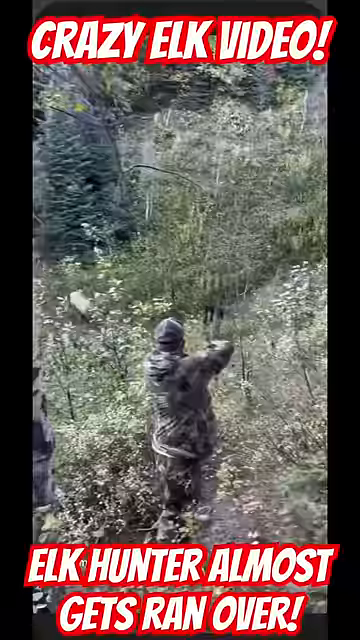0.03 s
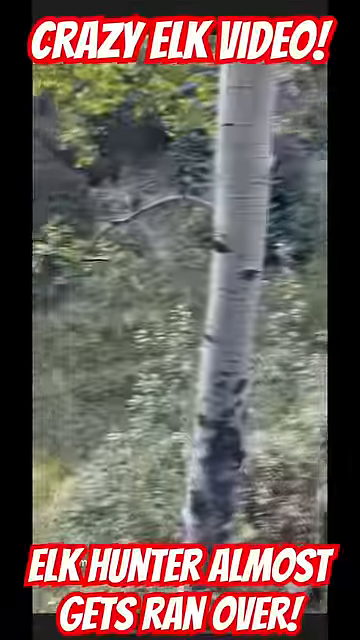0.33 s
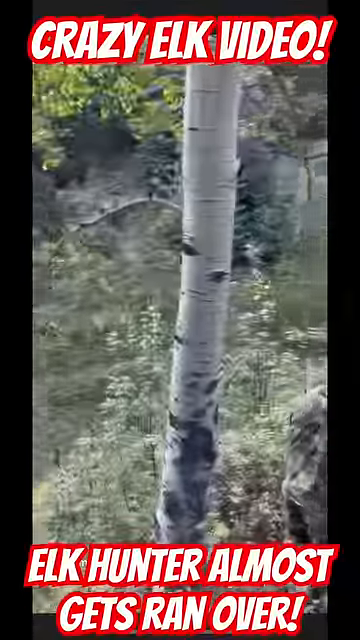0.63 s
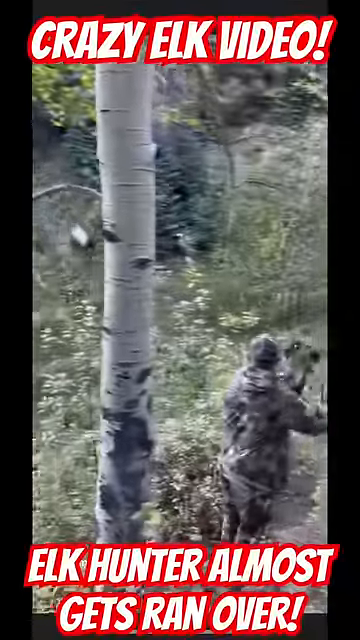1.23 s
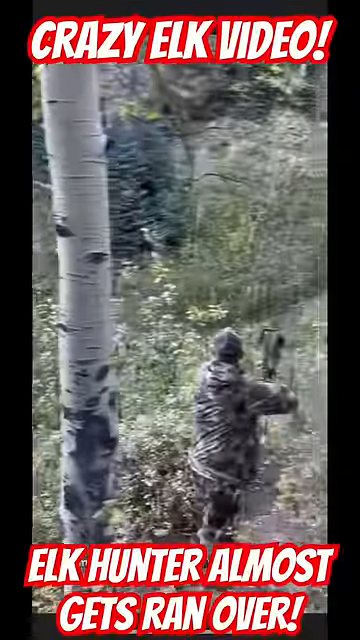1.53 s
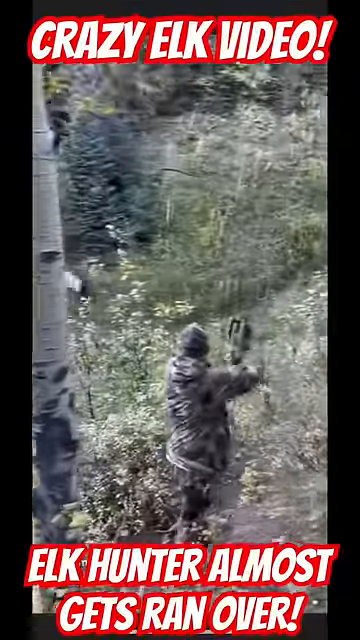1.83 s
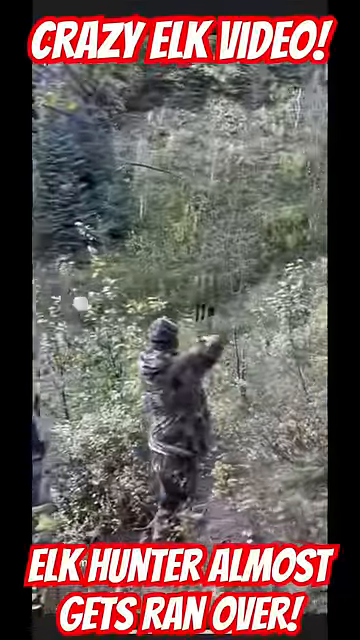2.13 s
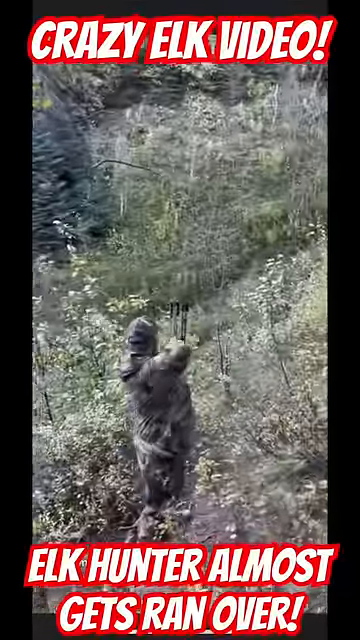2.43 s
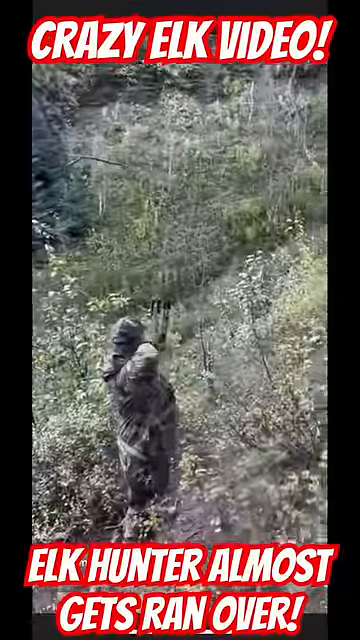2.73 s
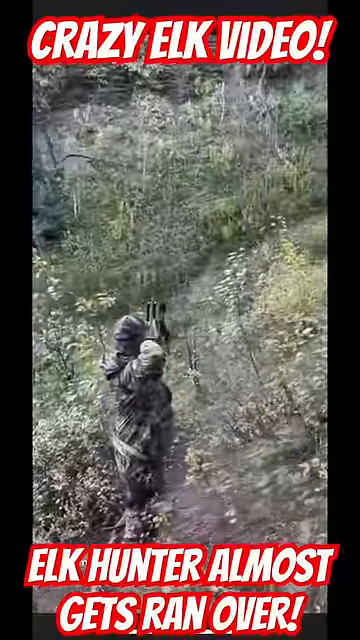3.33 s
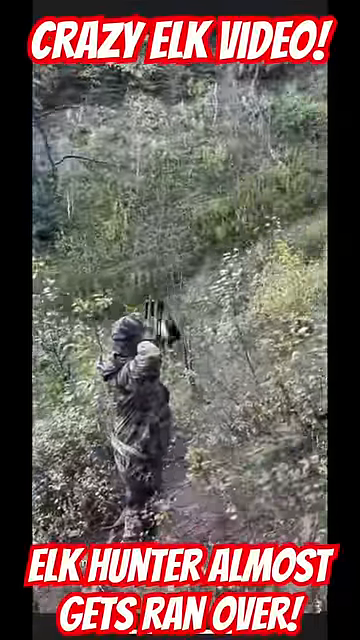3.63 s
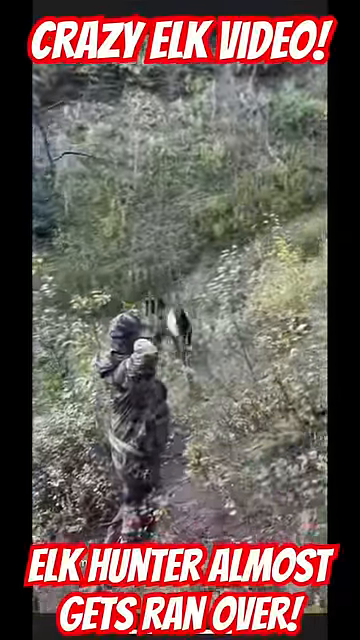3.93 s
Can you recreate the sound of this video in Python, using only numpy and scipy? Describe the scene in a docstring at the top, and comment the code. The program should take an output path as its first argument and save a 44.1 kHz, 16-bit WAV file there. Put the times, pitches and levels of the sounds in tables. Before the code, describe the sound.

An elk call is the loudest sound, arriving at the end. First, leaves and clothing swish quietly and dry stems crackle, with soft steps and low microphone rumble. A twig snaps sharply, very close, at about 1.5 seconds. Thuds grow heavier between 2 and 2.6 seconds. At 3.7 seconds the elk squeals, high and clean, sliding down into a raspier nasal mew through 4 seconds, with a brief woodland echo.

```python
"""In dry brush among trees, someone walks with a hand-held camera. The handling rumbles, steps thud,
leaves and clothing rub and swish, stems crackle, and one twig snaps very close by.
Then a loud elk call starts as a high clean squeal and slides down into a nasal mew:
a gliding tone and its overtones, shaped by the throat and scattered briefly by the trees."""
import sys
import numpy as np
from scipy import signal
from scipy.fft import rfft, irfft
from scipy.io import wavfile
from scipy.ndimage import uniform_filter1d, map_coordinates

SR = 44100
rng = np.random.default_rng(int(sys.argv[2]) if len(sys.argv) > 2 else 0)


def master(y):
    """Save y as 16-bit WAV."""
    cut = np.clip(np.atleast_2d(y).T, -1, 1)
    pcm = np.round(cut * 32767)  # scale
    wavfile.write(sys.argv[1], SR, pcm.astype(np.int16))


N = 176400
T = np.arange(N) / SR
HZ = np.fft.rfftfreq(N, 1 / SR)
EARS = np.array([[.5], [-.5]])  # half to the left ear, the opposite to the right


def amp(db):
    """Turns decibels into a gain."""
    return 10 ** (np.asarray(db) / 20)


def unit_rms(x):
    """Scales a sound to an average power of 1."""
    return x / np.sqrt(np.mean(x ** 2) + 1e-20)


def over_time(rows, col=1):
    """Joins the points of a time table, one value per sample."""
    rows = np.array(rows)
    return np.interp(T, rows[:, 0], rows[:, col])


def at_freq(rows, hz, col=1):
    """Looks up a frequency table on a log axis."""
    rows = np.array(rows)
    return np.interp(np.log(hz + 1), np.log(rows[:, 0]), rows[:, col])


def add(mix, start_s, sound):
    """Mixes a sound in at start_s."""
    part = mix[:, round(start_s * SR):][:, :sound.shape[-1]]
    part += sound[..., :part.shape[1]]


def wander(rate_hz):
    """Random drift, up to about rate_hz."""
    return unit_rms(irfft(rfft(rng.standard_normal(N)) / (1 + (HZ / rate_hz) ** 4), N))


# How alike the two ears are (1 = the same): freq_hz, likeness
EAR_LIKENESS = [(60, 1), (150, 0.84), (700, 0.3), (1400, 0.77), (4500, 0.35), (7500, 0.86)]
def spread(pair, colour):
    """Gives two noises a tone colour and makes them partly alike, as left and right."""
    a, b = rfft(pair)
    likeness = np.clip(at_freq(EAR_LIKENESS, HZ), -1, 1)
    mid, side = a * np.sqrt(1 + likeness), b * np.sqrt(1 - likeness)
    return unit_rms(irfft(np.array([mid + side, mid - side]) * amp(at_freq(colour, HZ)), N))


def woods(x, build_s=0.033, fade_60db_s=0.28):
    """Trunks and leaves scatter a sound into tiny echoes that build up and die away."""
    t = T[:SR // 2]
    echoes = rng.standard_normal((2, len(t))) * (rng.random((2, len(t))) < .05)
    echoes *= amp(-60 * t / fade_60db_s) * np.minimum(t / build_s, 1) ** 2
    return signal.fftconvolve(x, echoes / np.linalg.norm(echoes[0]), axes=1)[:, :N]


# Loudness of the handling: time_s, level_db
RUMBLE_LEVEL = [(.1, -59), (.5, -57.5), (.98, -44.5), (1.13, -58), (1.7, -50), (1.9, -42.5), (2.6, -40.5),
                (2.9, -47.5), (3.25, -46), (3.75, -56.5)]
# Its deep tone colour: freq_hz, gain_db
RUMBLE_COLOUR = [(20, -25.5), (40, 1), (70, 2), (200, -12), (1000, -58)]
def rumble(wobble_db=2.5):
    """The camera moving in the hand makes a low, uneven noise."""
    level_db = over_time(RUMBLE_LEVEL) + wobble_db * wander(rate_hz=13)
    return amp(level_db) * spread(rng.standard_normal((2, N)), RUMBLE_COLOUR)


# Steps and handling bumps: start_s, level_db, pitch_hz, decay_s
THUDS = [(0.186, -40, 71, 0.0097), (0.534, -41, 187, 0.0077), (0.736, -33, 65, 0.019),
         (0.906, -36, 196, 0.017), (.926, -34.5, 230, 0.0022), (1.024, -30, 170.6, 0.009),
         (1.962, -28.5, 75.5, 0.0079), (2.204, -27, 63.6, 0.023), (2.348, -24.5, 166, 0.0041),
         (2.399, -27.5, 159, 0.0048), (2.434, -29.5, 80, 0.011), (2.563, -18, 136, 0.0036),
         (2.582, -22, 75.3, 0.018), (2.986, -37, 49, 0.018)]
# Tone colour of their scuff: freq_hz, gain_db
SCUFF_COLOUR = [(240, 7), (750, -14.5), (2500, -45)]
def thuds(scuff_gain=.45, scuff_decay_s=.011):
    """Each bump is a low knock that dies quickly, with a dull scuff."""
    out, t = np.zeros((2, N)), T[:SR // 4]
    noise = spread(rng.standard_normal((2, N)), SCUFF_COLOUR)
    for start_s, db, hz, decay_s in THUDS:
        knock = -np.sin(2 * np.pi * hz * t) * t / decay_s * np.exp(1 - t / decay_s)
        scuff = scuff_gain * np.exp(-t / scuff_decay_s) * noise[:, round(start_s * SR):][:, :len(t)]
        add(out, start_s, amp(db) * (knock + scuff))
    return out


def friction(colour, ticks_per_s=2500, tick_share=0.4, tick_spread_db=3, patch_db=1.4, flicker_db=1.45):
    """Many tiny leaf contacts tick over a smooth wash of noise."""
    ticks = rng.standard_normal((2, N)) * (rng.random((2, N)) < ticks_per_s / SR)
    ticks *= amp(tick_spread_db * np.minimum(rng.exponential(1, (2, N)), 4))
    rub = rng.standard_normal((2, N)) * (1 - tick_share) + tick_share * unit_rms(ticks)
    spectra = signal.stft(rub, nperseg=512)[2]
    # random patches of frequency and time get louder or softer
    patches = uniform_filter1d(rng.standard_normal(spectra.shape[1:]), size=8, axis=0)
    patches = unit_rms(uniform_filter1d(patches, size=7, axis=1))
    rub = signal.istft(spectra * amp(patch_db * patches), nperseg=512)[1][:, :N]
    return spread(rub, colour) * amp(flicker_db * wander(rate_hz=40))


# Constant stirring of the brush: time_s, level_db
STIR_LEVEL = [(.1, -56), (.6, -55), (.8, -49.5), (1.4, -48.5), (1.55, -45.5), (1.65, -48.5), (2.05, -44),
              (2.3, -50), (2.5, -44.5), (2.8, -51), (3.68, -53), (3.76, -57.5)]
# Swishes of leaves and cloth: peak_s, length_s, body_db, hiss_db
SWISHES = [(0.15, 0.036, -49, -39.5), (0.283, 0.031, -51, -69), (0.538, 0.053, -54.5, -48),
           (0.723, 0.021, -42, -52), (0.898, .025, -43.5, -65), (0.932, 0.02, -36, -67),
           (1.074, 0.021, -45, -43.5), (1.235, 0.075, -45, -44), (1.868, 0.02, -38, -44),
           (1.971, 0.043, -39.5, -58), (2.231, 0.026, -43.5, -45.5), (2.614, 0.04, -41, -50),
           (2.819, 0.018, -40.5, -44.5), (2.879, 0.1, -46.5, -46), (3.146, 0.03, -46, -43),
           (3.386, 0.022, -49.5, -39.5), (3.622, 0.04, -49.5, -43)]
# Tone colour of the dull body: freq_hz, gain_db
BODY_COLOUR = [(200, 3), (450, 1.5), (1400, 0), (2200, -4.5), (3500, -8), (5000, -12.5), (16000, -32)]
# Tone colour of the leafy hiss: freq_hz, gain_db
HISS_COLOUR = [(500, -44), (2000, -3.5), (3800, -3), (5000, -4.5), (6500, 1), (9300, -1), (11500, -14),
               (15000, -7.5)]
def brush(rise_ratio=0.76, heavy_db=-50.5, low_hz=694):
    """Leaves and clothing rub in swishes that swell and fade; light movement has less bass."""
    body_power = hiss_power = amp(over_time(STIR_LEVEL)) ** 2
    for peak_s, length_s, body_db, hiss_db in SWISHES:
        width_s = length_s * np.where(T < peak_s, rise_ratio, 1)
        swell = np.exp(-2 * abs((T - peak_s) / width_s) ** 1.86)
        body_power = body_power + swell * amp(body_db) ** 2
        hiss_power = hiss_power + swell * amp(hiss_db) ** 2
    rub = friction(BODY_COLOUR)
    lightness = 1 - np.minimum(np.sqrt(body_power) / amp(heavy_db), 1)
    bass = irfft(rfft(rub) / (1 + (HZ / low_hz) ** 10), N)
    return np.sqrt(body_power) * (rub - lightness * bass) + np.sqrt(hiss_power) * friction(HISS_COLOUR)


# Stems cracking: start_s, level_db, centre_hz
STEM_CRACKS = [(0.1294, -38, 1250), (.154, -32.5, 2970), (.655, -36.5, 1130), (0.703, -36.5, 1580),
               (.794, -38, 1100), (.84, -39, 4500), (0.894, -31.5, 2040), (.907, -32, 1140),
               (0.933, -31.5, 4000), (1.96, -32.5, 2450), (2.362, -36.5, 6500), (2.401, -31.5, 2040),
               (2.479, -33.5, 860), (3.131, -29.5, 1670), (3.16, -37.5, 3750), (3.195, -35.5, 3970),
               (3.373, -39, 3460), (3.387, -33.5, 2620), (3.604, -35.5, 4200)]
def stems(decay_s=0.0027, width_octaves=1.05):
    """Each dry stem breaks with a short burst of noise in its own frequency band."""
    out, t = np.zeros((2, N)), T[:2048]
    hz = np.fft.rfftfreq(len(t), 1 / SR)
    for start_s, db, centre_hz in STEM_CRACKS:
        noise = rng.standard_normal(len(t)) + 1.2 * rng.standard_normal((2, len(t)))
        band = np.exp(-(np.log2((hz + 1) / centre_hz) / width_octaves) ** 2)
        burst = unit_rms(irfft(rfft(noise) * band))
        add(out, start_s, amp(db) * burst * np.exp(-t / decay_s))
    return out


# Ringing tones of the twig: pitch_hz, level_db, fade_60db_s, left_lead_rad
TWIG_TONES = [(1490, -7, 0.0069, 1.95), (3410, -0.5, 0.013, 2.6), (4600, 5.5, 0.0048, 2.08),
              (5180, 3, 0.0036, 2.07), (8840, -7, 0.0042, 3.6), (12900, -7.5, 0.0038, 0.78)]
def twig(start_s=1.4539, rise_s=0.00016, splinter_db=-14, splinter_decay_s=0.0019, echo_db=-37):
    """One very close snap: the wood splinters and rings for an instant."""
    out, t = np.zeros((2, N)), T[:SR // 20]
    for hz, db, fade_s, lead in TWIG_TONES:
        envelope = amp(db - 60 * t / fade_s) * (1 - np.exp(-t / rise_s))
        add(out, start_s, envelope * np.sin(2 * np.pi * hz * t + lead * EARS))
    splinters = spread(rng.standard_normal((2, N)), HISS_COLOUR)[:, :len(t)]
    add(out, start_s, amp(splinter_db) * splinters * np.exp(-t / splinter_decay_s))
    return out + amp(echo_db) * woods(out)


# How the elk's throat and mouth shape its sound: freq_hz, gain_db
THROAT = [(550, -5.5), (800, -3.5), (1300, -1), (2400, 6.5), (2950, 2.5), (3350, 0.5), (4150, -5),
          (4900, -8), (5400, -14)]
# Direction of the call: freq_hz, left_lead_rad, left_minus_right_db
CALL_DIRECTION = [(587, 4.4, -7), (1220, 2.07, -7), (1840, 2.58, -0.5), (2600, 1.4, 1), (3320, 2, 0),
                  (3870, 1.6, 7)]
def elk_breath(pitch_hz, low_hz=1100, top_hz=4600, pitch_follow=.12):
    """Air rasps through the throat, a band of noise that sinks a little with the pitch."""
    band = amp(at_freq(THROAT, HZ) / 2) * HZ ** 4 / (HZ ** 4 + low_hz ** 4) / (1 + (HZ / top_hz) ** 30)
    direction = np.exp(1j * EARS * at_freq(CALL_DIRECTION, HZ))
    air = irfft(rfft(rng.standard_normal(N)) * band * direction, N)
    position = np.cumsum((pitch_hz / pitch_hz[-1]) ** pitch_follow) % N  # slower reading sounds lower
    return unit_rms(np.array([map_coordinates(ear, [position]) for ear in air]))


# Harmonics (multiples of the pitch), lowest first: level_db
HARMONICS_DB = [1, -4.5, -6.5, -7.5, -8.5, -5, -9]
def elk_voice(pitch_hz, bright_db, soft_db=-21, full_voice_s=3.748, fray_rad=.6):
    """The voice starts almost pure, then gains wavering overtones; the highest ones flutter."""
    phase = 2 * np.pi * np.cumsum(pitch_hz) / SR
    soft_start_db = soft_db * np.clip((full_voice_s - T) / 0.019, 0, 1)
    top_hz = 3500 + 1.12 * pitch_hz  # overtones fade out above this
    voice = np.zeros((2, N))
    for k, db in enumerate(HARMONICS_DB, 1):
        hz = k * pitch_hz
        level_db = db + at_freq(THROAT, hz) + bright_db * max(k - 2, 0) + soft_start_db * (k > 1)
        gain = amp(level_db + EARS * at_freq(CALL_DIRECTION, hz, 2)) / (1 + (hz / top_hz) ** 40)
        fray = fray_rad * np.minimum(hz / top_hz, 1) ** 6 * wander(rate_hz=350)
        waver = amp(2 * amp(bright_db) * wander(rate_hz=56.3))
        voice -= gain * waver * np.cos(k * phase + fray + EARS * at_freq(CALL_DIRECTION, hz))
    return voice


# The tune of the call: time_s, pitch_hz
CALL_PITCH = [(3.69, 1573), (3.716, 1600), (3.742, 1682), (3.754, 1789), (3.775, 1802), (3.8, 1745),
              (3.822, 1645), (3.84, 1520), (3.86, 1315), (3.88, 1075), (3.903, 875), (3.95, 712),
              (4.0, 590)]
# How hard the elk calls: time_s, level_db, bright_db (added per harmonic above the second)
CALL_EFFORT = [(3.69, -57.5, -3), (3.736, -15.5, -8.5), (3.748, -9, -14), (3.797, -14, -11),
               (3.825, -10, -6.5), (3.865, -15, 0), (3.882, -14, -2), (3.905, -13, 1), (3.97, -16, 0.5),
               (4.0, -18.5, 1)]
def elk(jitter=0.00506, breath_db=-12.5, echo_db=-26):
    """Voice and breath make one call that gets brighter and raspier as it falls."""
    pitch_hz = uniform_filter1d(over_time(CALL_PITCH), size=400) * (1 + jitter * wander(rate_hz=458))
    bright_db = over_time(CALL_EFFORT, 2)
    voice = elk_voice(pitch_hz, bright_db)
    rasp = amp(breath_db - (bright_db / 1.95) ** 2) * elk_breath(pitch_hz)
    call = amp(over_time(CALL_EFFORT)) * (T > CALL_PITCH[0][0]) * (voice + rasp)
    return call + amp(echo_db) * woods(call)


def scene():
    """The walk through the brush, the twig and the elk."""
    return brush() + stems() + thuds() + rumble() + twig() + elk()


def record(dry, silent_s=.1, top_hz=15900):
    """Mutes the first moment, caps peaks at full scale and cuts the highest treble."""
    capped = np.clip(dry * (T > silent_s), -1, 1)
    lowpass = signal.firwin(511, top_hz, window=("kaiser", 9), fs=SR)
    return signal.oaconvolve(capped, lowpass[None], "same")


dry = scene()
out = record(dry)
master(out)
```